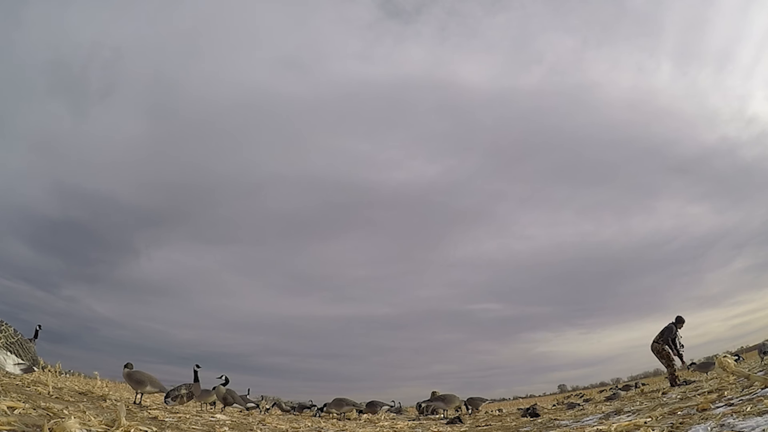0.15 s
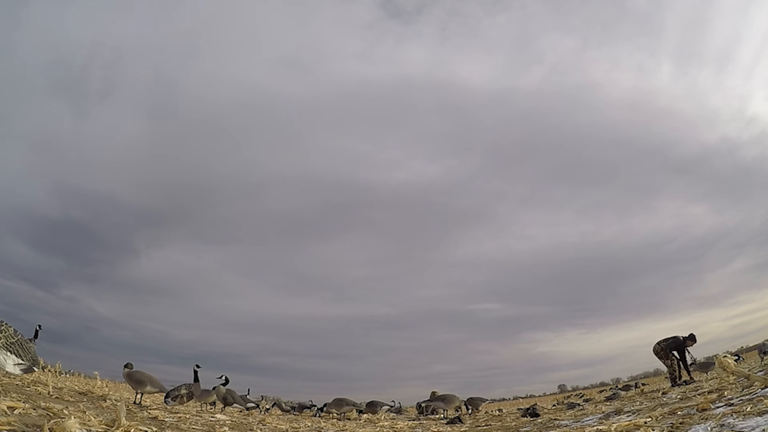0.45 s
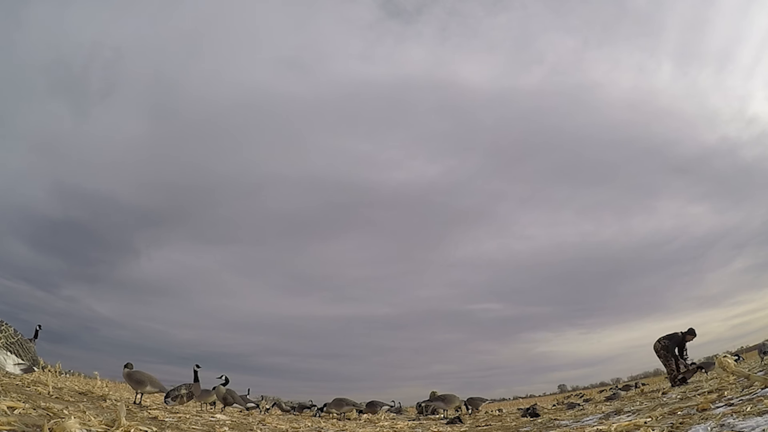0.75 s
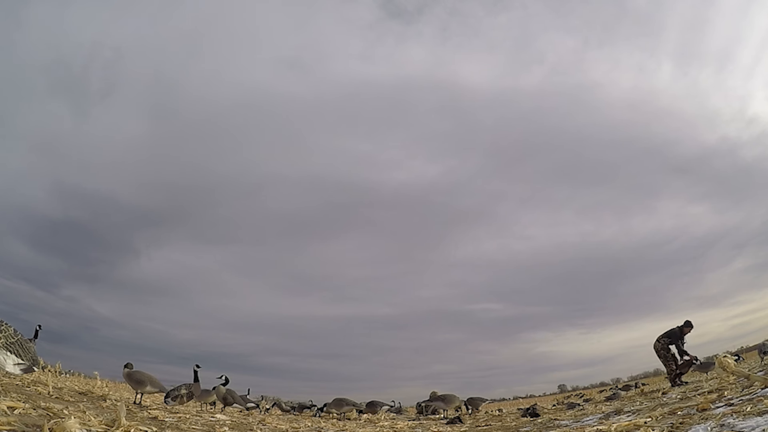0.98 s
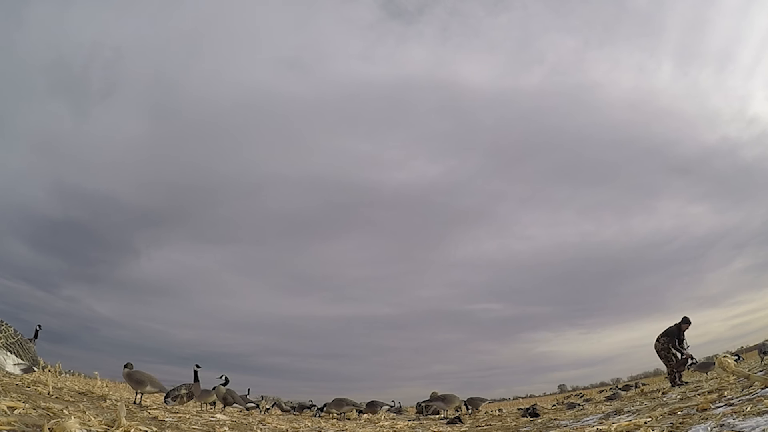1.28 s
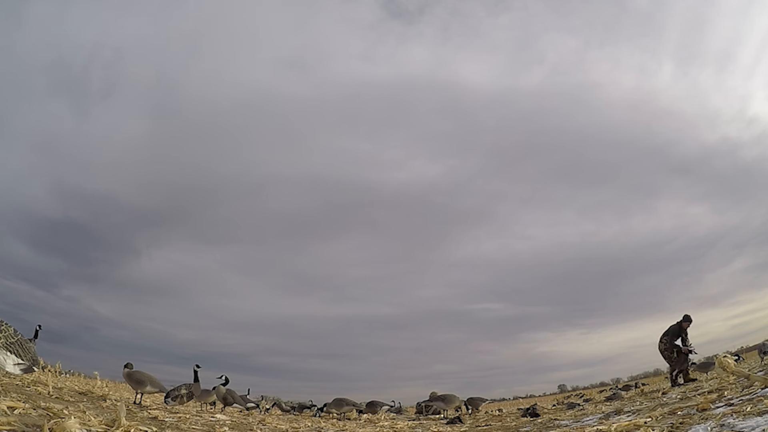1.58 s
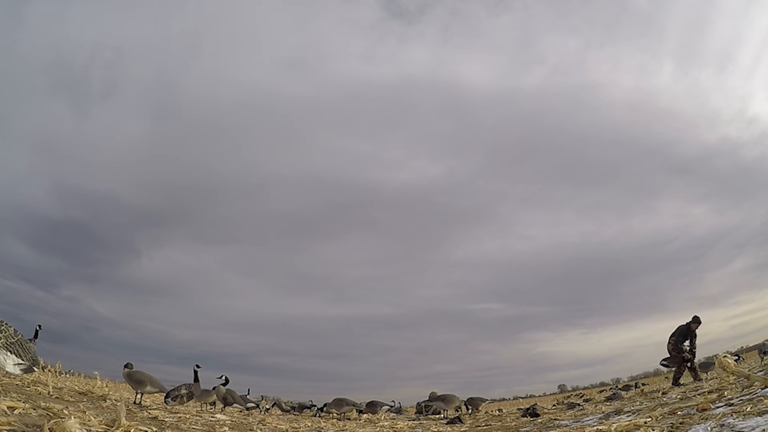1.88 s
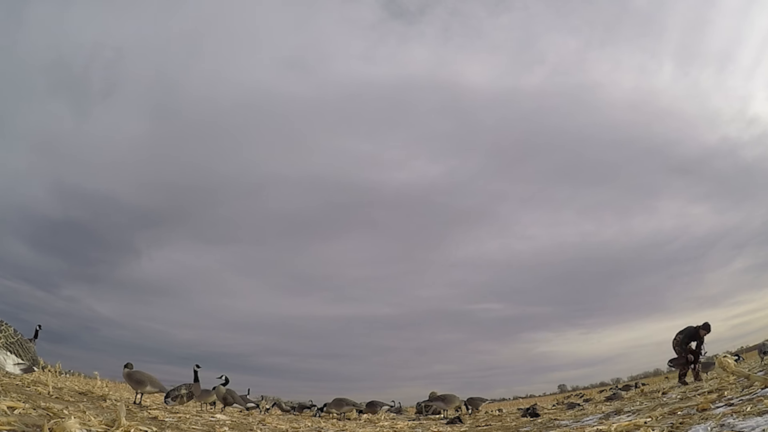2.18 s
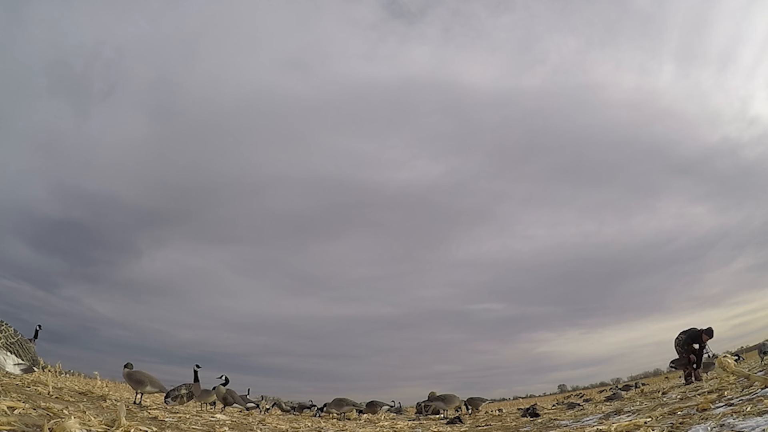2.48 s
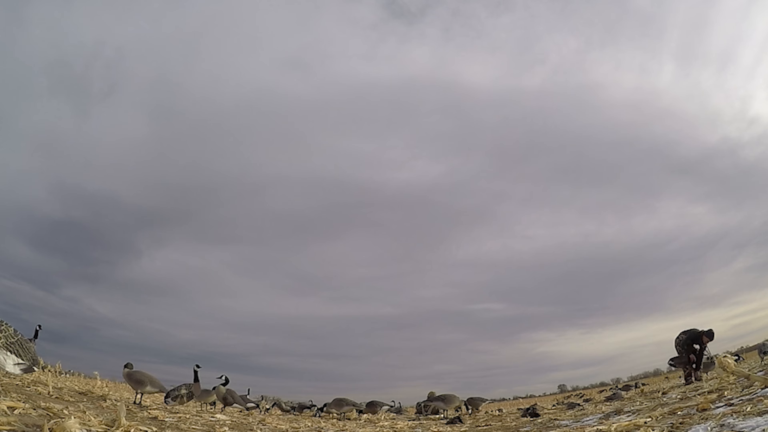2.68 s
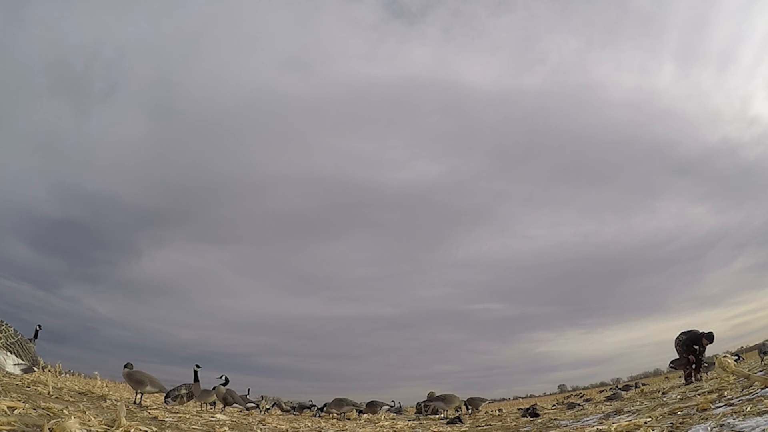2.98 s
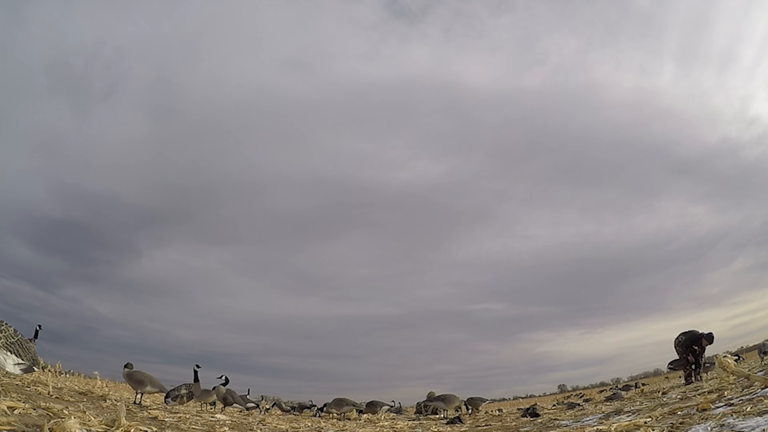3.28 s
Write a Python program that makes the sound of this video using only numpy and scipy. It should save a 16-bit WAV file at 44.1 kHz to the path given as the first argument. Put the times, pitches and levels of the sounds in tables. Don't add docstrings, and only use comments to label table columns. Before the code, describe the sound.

Strong wind buffets a small microphone near the ground in an open stubble field, a loud deep rumble throughout, strongest in the first second, with faint hiss and dry stalk snaps and rustles slightly to the right.

```python
import sys
import numpy as np
from scipy import signal
from scipy.io import wavfile
from scipy.ndimage import uniform_filter1d, minimum_filter1d

SR = 44100
rng = np.random.default_rng(int(sys.argv[2]) if len(sys.argv) > 2 else 0)


def gain_from_db(level_db):
    decades = np.asarray(level_db, float) / 20
    return 10 ** decades


def dump(signal):
    limited = np.clip(np.atleast_2d(signal).T, -1, 1)
    pcm = np.round(limited * 32767).astype(np.int16)
    wavfile.write(sys.argv[1], SR, pcm)


N = 152145


def wind():
    # (time [s], strength [dB])
    gusts = [(0.0, -4), (0.07, -7.5), (0.35, -13), (0.37, -8), (0.48, -10.5), (0.74, -4.5), (0.96, -11.5),
             (0.98, -6), (1.16, -10), (2.97, -10), (3.0, -12.5), (3.04, -12.5), (3.12, -9), (3.45, -11)]
    # (frequency [Hz], level [dB per Hz])
    rumble_shape = [(3, 6), (6, 2), (20, -2), (42, 1), (74, -2), (147, -12), (210, -20.5), (430, -38.5),
                    (560, -87), (950, -120)]
    # (frequency [Hz], level [dB per Hz])
    roar_shape = [(250, -38), (420, -1), (584, 1), (806, -1.5), (1060, -9.5), (1210, -8.5), (1800, -23),
                  (2340, -83), (3960, -120)]
    # (frequency [Hz], level [dB per Hz])
    hiss_shape = [(1060, -9), (1800, 2.5), (3800, -7), (6200, -6), (7200, 2), (8200, -5.5), (10100, -6),
                  (13000, -16.5), (15000, -18), (16000, -36)]
    times, strength_db = np.transpose(gusts)
    mean_db = strength_db.mean()
    gust = np.interp(np.arange(N) / SR, times, strength_db - mean_db)
    rumble = air(rumble_shape, mean_db + 2.3 + 0.5 * gust, patchy_db=0.36, flicker_db=-0.88, size=8192)
    roar = air(roar_shape, -36 + 0.39 * gust, patchy_db=0.5, flicker_db=0.17, size=1024)
    hiss = air(hiss_shape, -49 + 0.033 * gust, patchy_db=1.12, flicker_db=0.83, size=512)
    return rumble + roar, hiss


def air(shape, level_db, patchy_db, flicker_db, size):
    # (frequency [Hz], share [0-1])
    alike = [(30, .985), (210, .95), (300, .8), (400, .45), (570, .78), (900, .45), (1100, .15),
             (1900, .35), (3500, .25), (4400, .55), (8000, .55), (9200, .08)]
    # (frequency [Hz], phase lead [radians])
    lead = [(120, 0), (300, -.55), (430, -3.2), (520, -4.5), (850, -6.1), (1600, -3.2), (2200, -3.8),
            (2600, -6.2), (4100, -5.5), (5400, -7), (6300, -9.3), (9000, -7.4)]
    # (frequency [Hz], left minus right [dB])
    lean = [(30, .5), (70, 1.2), (140, 2.2), (280, 3), (640, -2), (1300, -3.5), (3000, -1), (7000, -5),
            (13000, -1)]
    frames, hz = 4 * N // size + 5, np.fft.rfftfreq(size, 1 / SR)
    a, b, c, d, patch = rng.standard_normal((frames, len(hz), 5)).T
    patch = uniform_filter1d(patch, size=9, axis=0)
    patch = evened(uniform_filter1d(patch, size=7, axis=1))
    flicker = evened(uniform_filter1d(rng.standard_normal(frames), size=3))

    same = np.clip(read(alike, hz), 0, 1)[:, None]
    left = a + 1j * b
    right = same * left + np.sqrt(1 - same ** 2) * (c + 1j * d)
    right = right * np.exp(-1j * read(lead, hz))[:, None]
    tilt = gain_from_db(read(lean, hz) / 2)[:, None]
    loudness = gain_from_db(read(shape, hz)[:, None] + patchy_db * patch + flicker_db * flicker)
    spectra = np.array([left * tilt, right / tilt]) * loudness
    sound = signal.istft(spectra, nperseg=size, noverlap=3 * size // 4)[1][:, :N]
    return sound / np.sqrt(np.mean(sound.mean(0) ** 2)) * gain_from_db(level_db)


def cracks():
    # (time [s], peak [dB], middle ring [Hz], middle ring level [dB], dull ring level [dB])
    snaps = [(0.2218, -36, 4170, -34, -22), (0.514, -26, 4370, -14, -12.5), (0.5521, -33, 4510, -12, -19),
             (0.5916, -38, 5050, -8, -12), (0.7425, -34, 4500, -10, -14.5), (0.78, -33, 4460, -15, -15),
             (1.0395, -33, 4590, -7, -9), (1.0536, -41, 4250, -4, 0), (1.0824, -31, 4340, -13, -10),
             (1.2427, -42.5, 4300, 5, 3.5), (1.3231, -28, 4200, -14, -14), (1.5744, -38.5, 5000, -4, -3),
             (1.6216, -32, 4220, -10.5, -9), (1.6746, -36, 4910, -8, -12), (1.753, -32, 4540, -6, -8),
             (1.8496, -41.5, 5520, -9, -4), (2.2209, -35, 4510, -16, -19), (2.2352, -35.5, 4510, -4, -10),
             (2.2631, -21.5, 4420, -12, -14.5), (2.3131, -32, 5400, -8, -14), (2.375, -33, 4720, -15, -29),
             (2.4498, -25, 5460, -11, -21), (2.4656, -32.5, 5470, -2, -12), (2.485, -36, 4350, -1, -8)]
    out = np.zeros((2, N))
    for time, *snap in snaps:
        sound = crack(*snap)
        start = round(time * SR)
        out[:, start:start + sound.shape[1]] += sound
    return out


def crack(peak_db, middle_hz, middle_db, dull_db):
    # (frequency [Hz], width [Hz], level [dB])
    bright_rings = [(7200, 1600, 6), (8800, 2000, -5.5), (12000, 3600, -20)]
    t = np.arange(1400) / SR
    snap = 1.28 * np.exp(-t / 0.0013)
    slips = rng.standard_normal(len(t)) * ((rng.random(len(t)) < 0.04) + snap)
    drive = slips + 0.66 * rng.standard_normal((2, len(t)))
    splinter_t60_s = 0.03
    drive = drive * np.minimum(t / 0.000275, 1) * gain_from_db(-60 * t / splinter_t60_s)

    bright = 0
    for k, (hz, width, db) in enumerate(bright_rings):
        ring = resonate(resonate(drive, hz, width), hz, width)
        bright = bright + (-1) ** k * gain_from_db(db) * evened(ring)
    bright = evened(bright)
    middle = resonate(resonate(drive, middle_hz, 900), middle_hz, 450)
    dull = resonate(resonate(drive, 2690, 1500), 2690, 1500)
    sound = bright + gain_from_db(middle_db + 6.5) * evened(middle) + gain_from_db(dull_db + 9.5) * evened(dull)
    side_db = np.array([[-4.5], [0]])
    return sound / abs(bright).max() * gain_from_db(peak_db + 3.5 + side_db)


def rustle():
    ticks_per_s, spread_db, level_db = 6000, 3, -50
    size = gain_from_db(spread_db * np.minimum(rng.exponential(1, N), 4)) * sweeps()
    size = size * (rng.random(N) < ticks_per_s / SR)
    kind = rng.integers(0, 16, N)
    t = np.arange(300) / SR
    out = np.zeros((2, N))
    for k, hz in enumerate(np.geomspace(2500, 7700, num=16)):
        fade = gain_from_db(-60 * t / 0.0061 + 4.7 * np.log2(hz / 4000))
        ring = np.sin(2 * np.pi * hz * t) * np.minimum(t / 0.00065, 1) * fade
        tick = signal.oaconvolve(size * (kind == k), ring)[:N]
        out += gain_from_db(level_db) * np.array([0.59 * np.roll(tick, k - 4), tick])
    return out


def sweeps():
    # (start [s], length [s], strength [dB])
    brushes = [(0.19, 0.02, -4), (.55, 0.055, -9), (.65, 0.064, -4), (0.744, .063, -1), (1.036, 0.062, 4),
               (1.108, 0.3, -4.5), (1.542, 0.038, 1), (1.595, 0.047, 2), (1.75, 0.12, -5), (2.0, .03, -4),
               (2.146, 0.022, 0), (2.208, .05, -9), (2.44, .05, -22), (2.617, .04, -0.5), (2.677, 0.007, 4),
               (2.829, 0.014, 2)]
    t = np.arange(N) / SR
    movement = gain_from_db(-17)
    for start, length, db in brushes:
        rise = np.clip((t - start) / 0.0029, 0, 1)
        fade = np.exp(-np.maximum(t - start - length, 0) / 0.0087)
        movement = movement + gain_from_db(db) * rise * fade
    return movement


def evened(x):
    return x / np.sqrt(np.mean(x ** 2) + 1e-20)


def read(points, hz):
    f, value = np.transpose(points)
    return np.interp(np.log(hz + 1), np.log(f + 1), value)


def resonate(x, hz, width):
    return signal.lfilter(*signal.iirpeak(hz, hz / width, SR), x)


def scene():
    # (frequency [Hz], width [Hz], level [dB])
    ports = [
        (5640, 500, -3),
        (7790, 80, 3),
    ]
    low, hiss = wind()
    field = hiss + (cracks() + rustle())
    heard = [x + gain_from_db(db) * resonate(x, hz, width) for x, (hz, width, db) in zip(field, ports)]
    return low + np.array(heard)


def top_cut(x):
    return signal.sosfilt(signal.butter(12, 15800, fs=SR, output="sos"), x)


def record(dry):
    ceiling, look_s, split_hz = 0.965, 0.007, 330
    bass = signal.sosfiltfilt(signal.butter(2, split_hz, fs=SR, output="sos"), dry)
    look = 2 * int(look_s * SR) + 1
    gain = np.minimum(ceiling / (abs(bass).max(0) + 1e-9), 1)
    gain = minimum_filter1d(gain, look)
    gain = uniform_filter1d(uniform_filter1d(gain, look // 2), look // 2)
    held = np.clip(dry - bass * (1 - gain), -0.984, 0.984)
    return top_cut(held)


dry = scene()
out = record(dry)
dump(out)
```